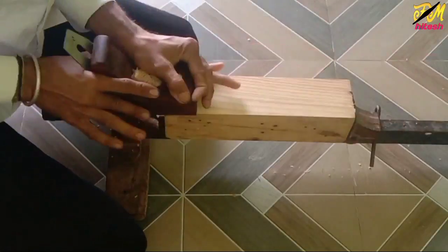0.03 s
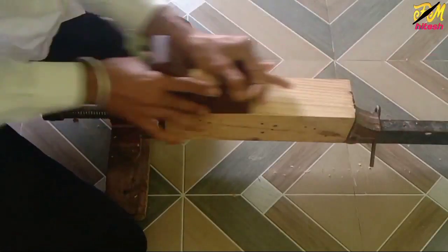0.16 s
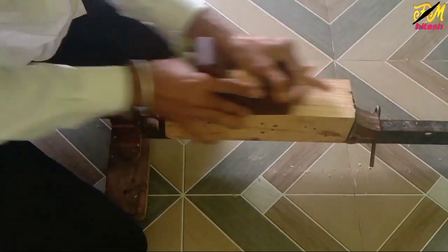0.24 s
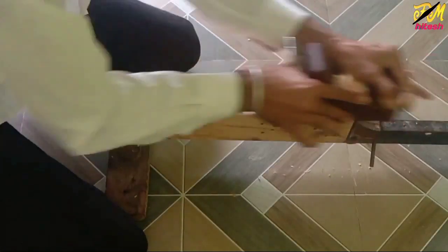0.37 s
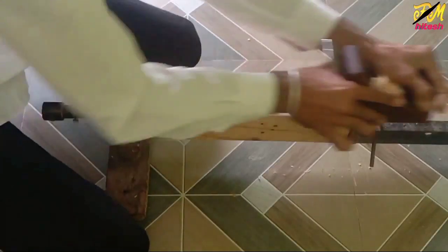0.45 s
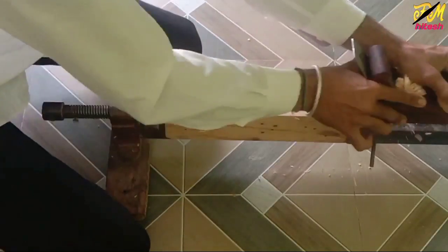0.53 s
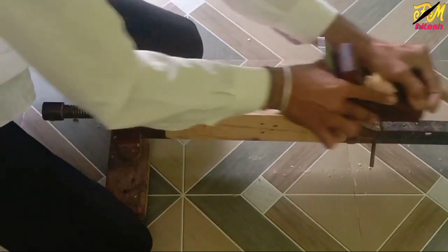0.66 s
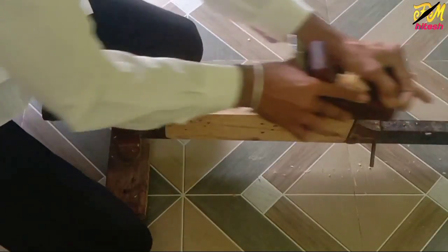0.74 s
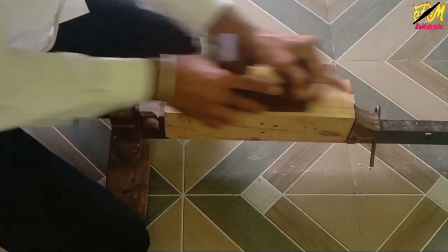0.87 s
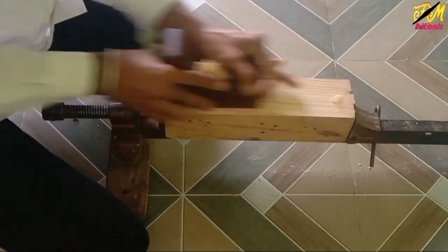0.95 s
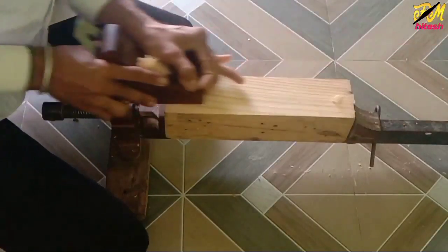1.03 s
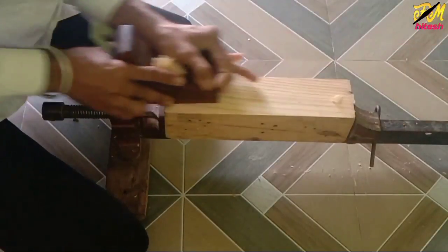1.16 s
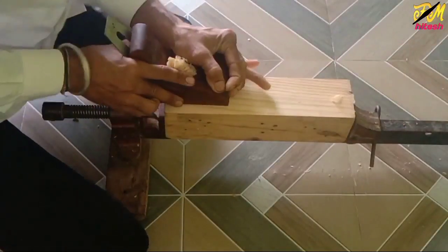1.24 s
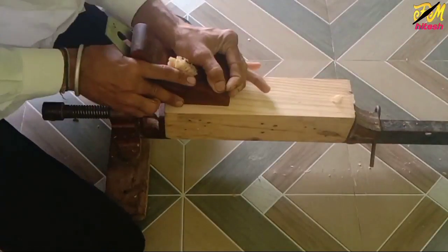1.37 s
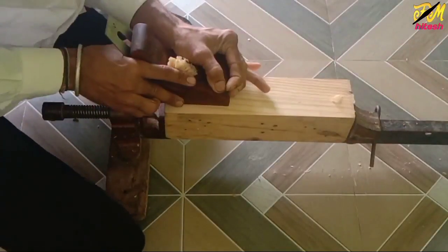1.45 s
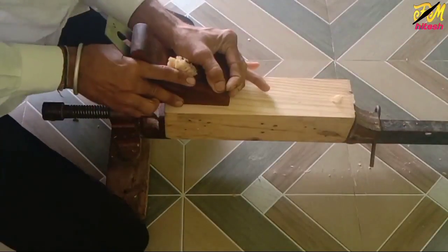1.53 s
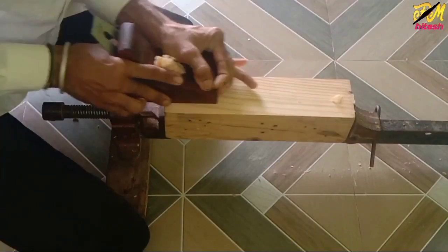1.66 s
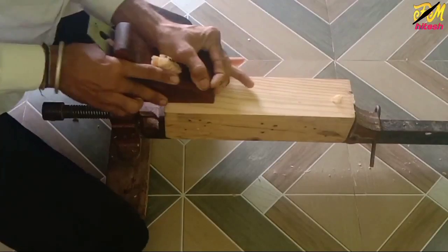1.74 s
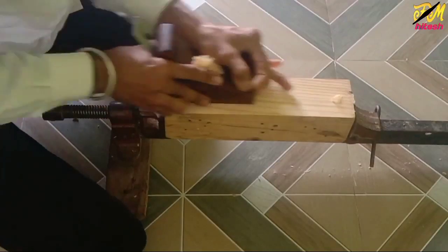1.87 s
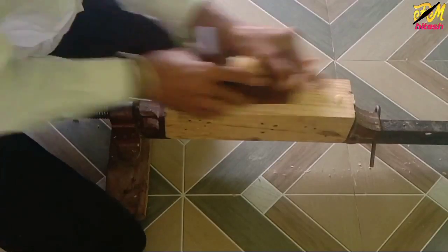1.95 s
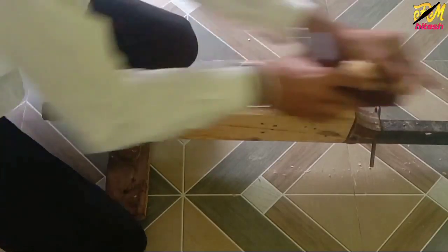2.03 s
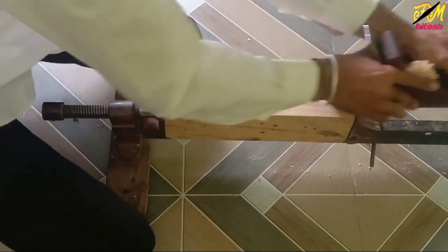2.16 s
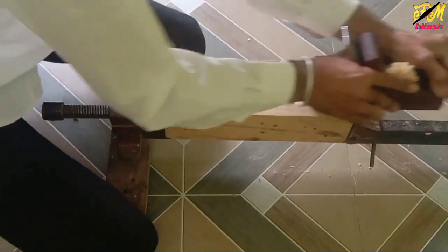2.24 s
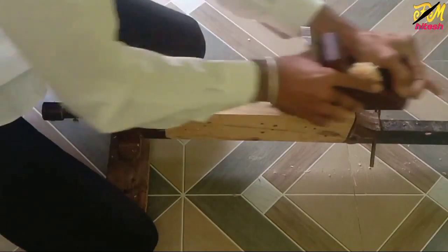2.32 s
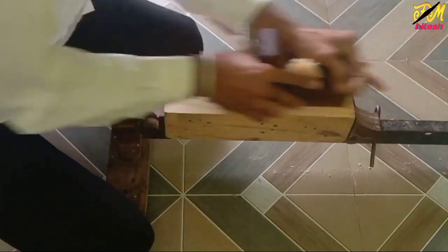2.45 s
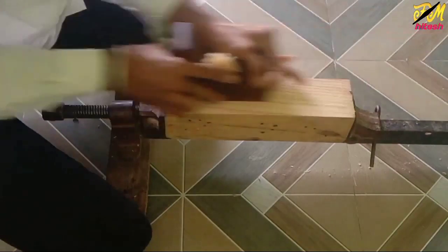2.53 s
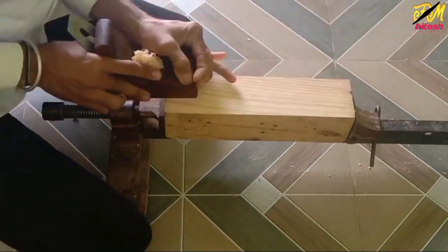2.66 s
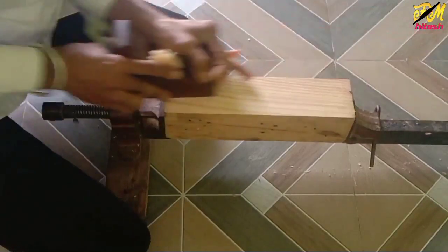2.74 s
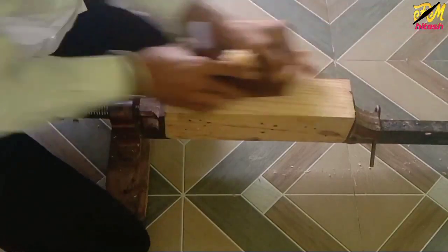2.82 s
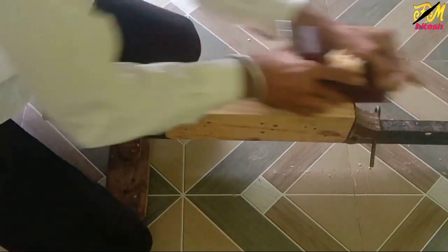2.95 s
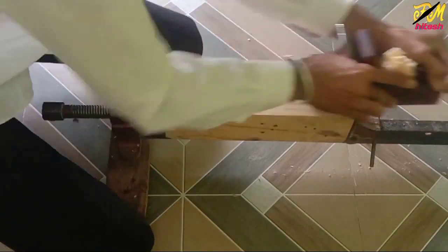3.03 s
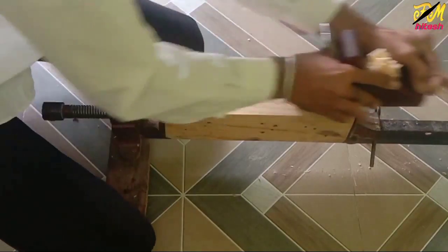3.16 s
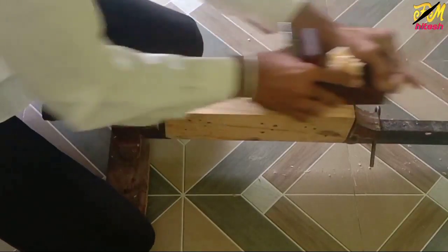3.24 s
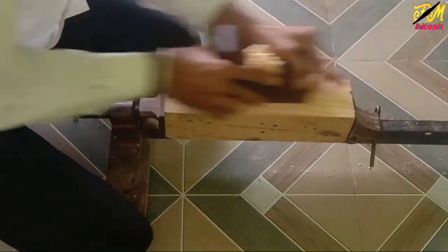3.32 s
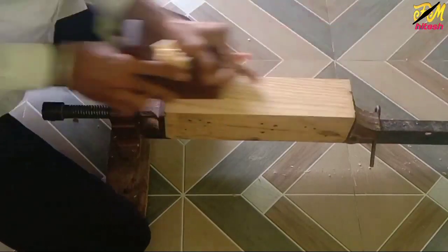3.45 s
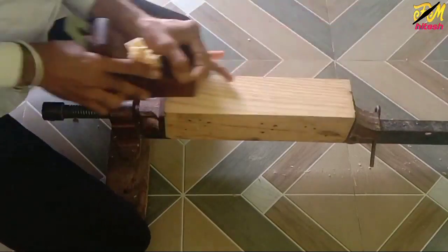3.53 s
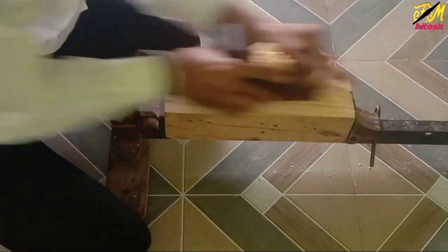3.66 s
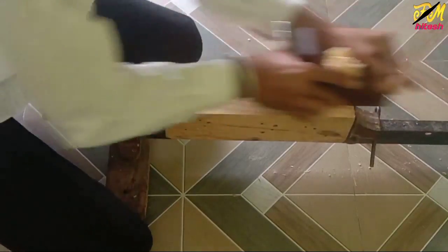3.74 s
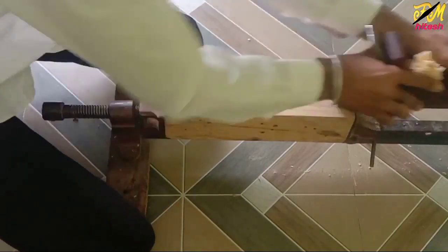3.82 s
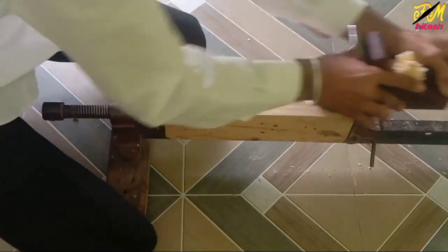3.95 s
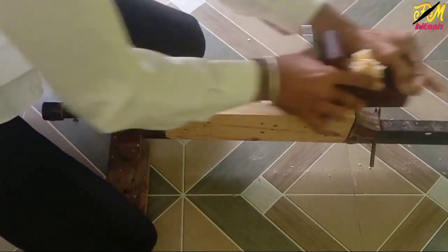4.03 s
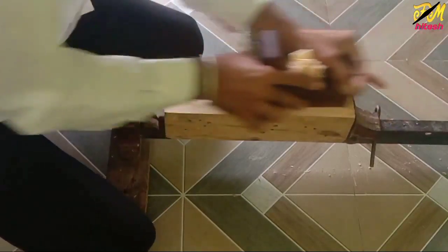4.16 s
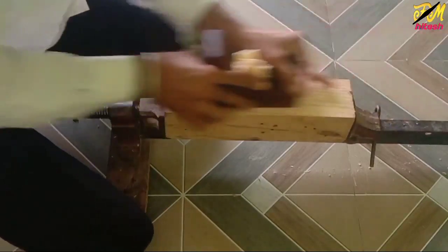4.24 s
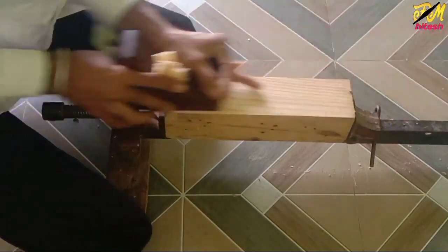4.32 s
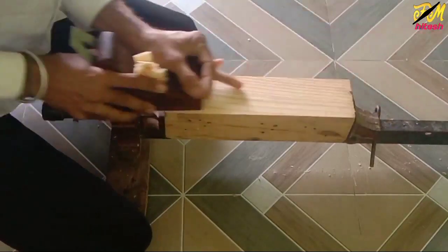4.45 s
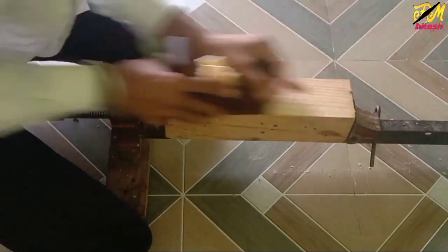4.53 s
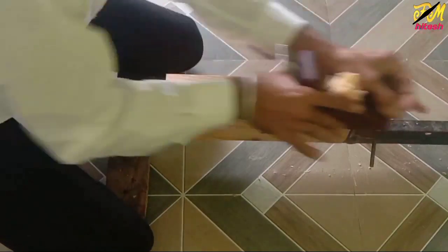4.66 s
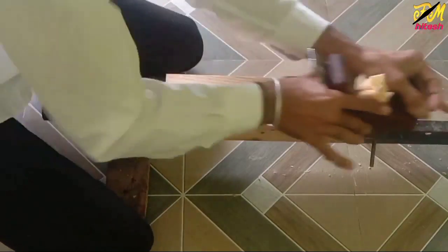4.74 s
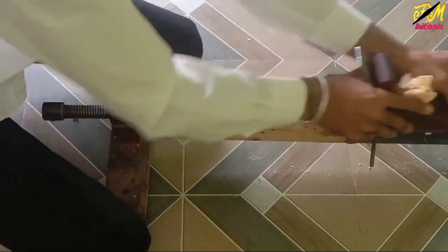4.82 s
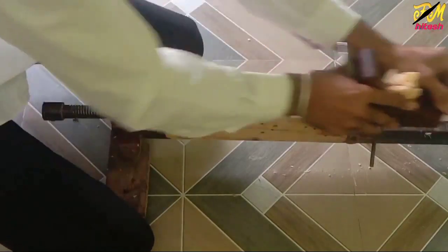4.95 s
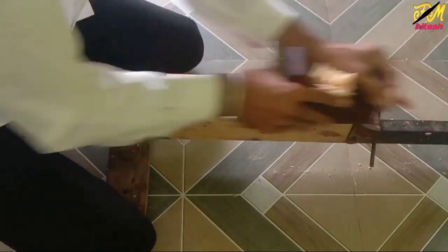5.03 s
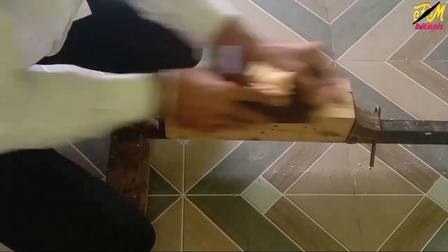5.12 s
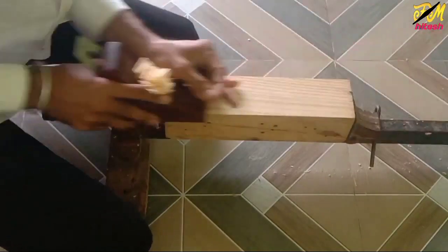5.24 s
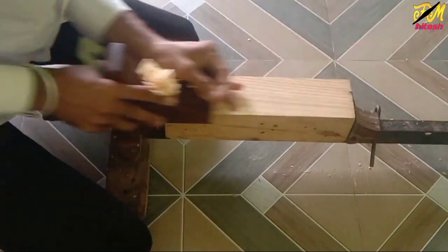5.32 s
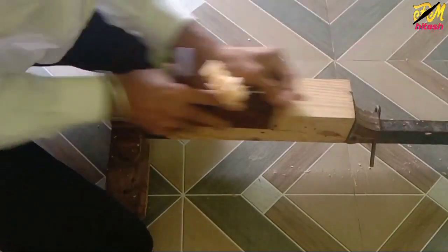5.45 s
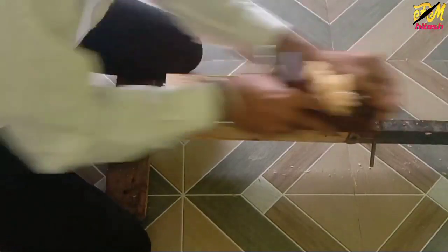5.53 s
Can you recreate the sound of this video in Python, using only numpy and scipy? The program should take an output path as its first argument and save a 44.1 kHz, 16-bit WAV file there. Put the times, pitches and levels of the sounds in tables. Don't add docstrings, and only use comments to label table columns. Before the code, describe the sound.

Close, mono phone pickup of planing wood. Each forward push starts with a small click, swells into a dry woody rasp with crackling hiss, and dies quickly into a short hard-room echo. Quieter, hollow drags and low knocks come between. After the first stroke the plane lands with a wooden clack and rests, then strokes continue to the end.

```python
import sys
import numpy as np
from scipy import signal
from scipy.fft import rfft, irfft
from scipy.io import wavfile
from scipy.ndimage import uniform_filter1d

SR = 44100
rng = np.random.default_rng(int(sys.argv[2]) if len(sys.argv) > 2 else 0)


def convert_level_to_amplitude(level_db):
    exponent = np.asarray(level_db, float) / 20
    return 10 ** exponent


def master(y):
    cut = np.clip(np.atleast_2d(y).T, -1, 1)
    pcm = np.round(cut * 32767)
    wavfile.write(sys.argv[1], SR, pcm.astype(np.int16))


N = 246246


def evened(x):
    return x / np.sqrt(np.mean(x ** 2) + 1e-20)


def read(points, hz):
    f, value = np.transpose(points)
    return np.interp(np.log(hz + 1), np.log(f + 1), value)


def add(mix, s, sound):
    part = mix[round(s * SR):][:len(sound)]
    part += sound[:len(part)]


def pole_radius(width_hz):
    return np.exp(-np.pi * 1.55 * width_hz / SR)


def resonate(x, hz, width):
    r = pole_radius(width)
    pole = r * np.exp(2j * np.pi * hz / SR)
    return 2 * signal.lfilter([(1 - r) ** 2], [1, -2 * pole, pole ** 2], x).real


def smooth(x, width):
    r = pole_radius(width)
    return signal.lfilter([(1 - r) ** 2], [1, -2 * r, r ** 2], x)


def ring(x, modes):
    click = np.eye(1, 6000)[0]
    shape = np.zeros(len(click))
    for k, (hz, width, db) in enumerate(modes):
        shape += (-1) ** k * convert_level_to_amplitude(db) * resonate(click, hz, width)
    return signal.oaconvolve(x, shape / np.linalg.norm(shape))[:len(x)]


def judder(span, depth_db):
    slow = uniform_filter1d(uniform_filter1d(rng.standard_normal(N), span), span)
    return convert_level_to_amplitude(depth_db * evened(slow))


def fibres(per_s, spread_db, rub):
    size = convert_level_to_amplitude(spread_db * np.minimum(rng.exponential(1, N), 4)) * rng.choice([-1., 1.], N)
    snaps = evened(size * (rng.random(N) < per_s / SR))
    return evened(snaps + rub * rng.standard_normal(N))


def swell(rise, top_db, below_db, bend, fade_db_s, touch=0.0014):
    t = np.arange(0, 1.1, .0004)
    to_go = np.clip(1 - t / rise, 0, 1) ** bend
    level_db = top_db - below_db * to_go - fade_db_s * np.maximum(t - rise, 0)
    gain = np.minimum(t / touch, 1) * convert_level_to_amplitude(level_db)
    return np.interp(np.arange(0, t[-1], 1 / SR), t, gain)


def motion(rows, feeds, bend, hurry=1, touch=0.0014):
    power = np.zeros((len(feeds), N))
    for start, rise, top_db, below_db, colour_db in rows:
        for part, (db, share, slow_db, fade) in zip(power, feeds):
            level_db = top_db + db + share * colour_db
            gain = swell(rise, level_db, below_db + slow_db, bend, fade * hurry, touch)
            add(part, start, gain ** 2)
    return power


# start_s, rise_s, top_db, start_below_top_db, weight_db
DRAGS = [(0.0, 0.0066, -33.5, -23.5, 14.5), (0.06, 0.012, -40, 10, 12.5), (0.78, .06, -55.5, 8, 15),
         (0.838, 0.024, -45.5, -3, -2), (0.89, .12, -36, 20, 5), (1.0, 0.11, -35.5, 6.5, 14),
         (1.725, 0.087, -57.5, 11, 5), (1.812, .02, -57.5, -4, 9), (1.873, 0.067, -31.5, 20.5, -11),
         (2.41, 0.11, -45, 9, 5), (2.455, 0.26, -35.5, 17, 1.5), (3.335, 0.15, -40, 0.5, 1),
         (3.44, 0.09, -41, 12, 1), (3.553, 0.022, -37.5, -9, 5.5), (4.178, .01, -45.5, -2, 7),
         (4.195, 0.031, -43, 7, 11.5), (4.24, 0.136, -42, 6.5, 7.5), (4.345, .11, -39.5, -0.5, 13.5),
         (5.07, 0.087, -40.5, 12.5, 4), (5.135, 0.056, -40.5, 5, 4), (5.225, 0.05, -33, 5.5, 9),
         (5.3, 0.024, -37.5, -12, 14.5)]
# start_s, rise_s, top_db, start_below_top_db, weight_db
PRESSES = [(0.228, 0.02, -24, 4.5, -13), (0.281, .16, -22.5, -3.5, 4.5), (0.52, 0.08, -36, 6, 8),
           (1.912, 0.063, -19, 3.5, -3.5), (2.857, 0.042, -28, -1.5, -3.5), (3.0, 0.056, -25.5, 20, -2),
           (3.703, 0.0031, -28.5, -16, 4), (3.78, 0.064, -26, 28, -2), (4.576, 0.036, -22.5, -2, -0.5),
           (4.65, 0.046, -21, 28, 4.5), (4.8, 0.062, -32.5, -9, 10), (5.464, .03, -22.5, -5, -1.5),
           (5.51, 0.039, -39, -7, 30.5)]
# start_s, rise_s, top_db, start_below_top_db, thickness_db
CUTS = [(0.228, 0.019, -25, 2, 0.5), (0.281, 0.14, -25, 6.5, -8), (1.912, 0.13, -17, 20, 2.5),
        (2.857, 0.1, -16, 10.5, -8.5), (3.03, 0.032, -26.5, -7.5, 3.5), (3.703, 0.0057, -26.5, -4, -18),
        (3.788, 0.032, -19.5, -1, -4.5), (4.576, 0.023, -24, 10, 10), (4.66, 0.069, -21.5, 0.5, 8),
        (5.464, 0.1, -23.5, 3, 10)]
# start_s, rise_s, top_db, start_below_top_db, weight_db
SKID = [(1.294, 0.021, -31.5, 10, 15.7)]
# level_db, share_of_weight_or_thickness, extra_start_below_db, fade_db_s
DRAG_FEEDS = [
    (-4, 0.38, .1, 94),
    (-3.5, 0.67, 2, 236),
    (2, .01, 2, 200),
    (-11, .01, 0.8, 270),
    (1, 0.73, -4, 190),
    (1.5, 0.19, 4, 810),
    (-14.5, 0.17, -6, 47),
]
PRESS_FEEDS = [
    (0.5, .01, 3.5, 86),
    (-2, .01, 4.5, 97),
    (-10, 0.58, 5.2, 99),
    (-29.5, .01, -6.5, 95),
    (-0.5, 0.71, 3.5, 79),
    (-16, .01, -8, 70),
    (-21, -0.8, -8, 44),
]
CUT_FEEDS = [
    (-24, .3, 11, 90),
    (-3, 0.6, .1, 113),
    (0., .01, 4, 111),
    (-12, .01, 2, 154),
    (-22, 0.1, .1, 90),
    (-5, .01, 6, 165),
    (-73.5, 0.012, -11, 180),
]


def contact():
    back = motion(DRAGS, DRAG_FEEDS, bend=1.27, touch=0.0063)
    back += motion(SKID, DRAG_FEEDS, bend=1.27, hurry=1.7)
    push = motion(PRESSES, PRESS_FEEDS, bend=1.67) + motion(CUTS, CUT_FEEDS, bend=0.49)
    return np.sqrt(push + back)


# factor_on_pitch, width_hz, level_db
BLOCK = [(.9, 120, -12), (1.001, 55, 2.5), (1.05, 65, -1)]
# time_s, pitch_hz
BLOCK_PITCH = [(0.0, 1213), (0.73, 1273), (0.92, 1146), (1.121, 1255), (1.66, 1200), (1.76, 1050),
               (1.86, 1155), (2.11, 1234), (2.55, 1236), (2.71, 1147), (2.84, 1250), (3.06, 1283),
               (3.88, 1235), (4.12, 1222), (4.82, 1262), (5.221, 1217), (5.58, 1275)]


def block_ring(x):
    s, hz = np.transpose(BLOCK_PITCH)
    turns = np.cumsum(np.interp(np.arange(N) / SR, s, hz)) / SR
    out = np.zeros(N)
    for k, (factor, width, db) in enumerate(BLOCK):
        turn = np.exp(2j * np.pi * factor * turns)
        out += (-1) ** k * convert_level_to_amplitude(db) * 2 * (turn * smooth(x / turn, width)).real
    return convert_level_to_amplitude(20.0) * out


def patchy(x, depth_db):
    z = signal.stft(x, SR, nperseg=256, noverlap=192)[2]
    patches = uniform_filter1d(rng.standard_normal(z.shape[::-1]).T, size=3, axis=0)
    patches = evened(uniform_filter1d(uniform_filter1d(patches, size=18, axis=1), size=12, axis=1))
    z *= convert_level_to_amplitude(depth_db * patches - depth_db ** 2 / 3.35)
    return signal.istft(z, SR, nperseg=256, noverlap=192)[1][:N]


# pitch_hz, width_hz, level_db
WOOD = [(1056, 135, -1), (1560, 215, 3), (1900, 212, -2.5), (2064, 237, 0.5)]
BODY = [(2625, 1000, -6.5), (2880, 263, 3.5), (3250, 257, 3), (3520, 850, -5.5)]
SHAVING = [(4950, 870, 0), (5890, 690, -0.5), (6560, 400, 2), (7480, 900, -9)]
EDGE = [(9300, 1400, -3.5), (10630, 1270, -4.5), (12100, 730, -8.5), (15170, 970, 0.5)]
IRON = [(3900, 170, 6), (4203, 400, -10)]


def planing(wood, body, hiss, fizz, block, iron):
    grip = judder(span=1500, depth_db=1.81)
    tear = evened(grip * fibres(per_s=2500., spread_db=3.0, rub=0.94))
    curl = evened(grip * fibres(per_s=3800.0, spread_db=3.0, rub=1.5))
    rings = block_ring(block * tear * judder(span=220, depth_db=0.5))
    rings += ring(iron * tear * judder(span=540, depth_db=4.0), IRON)
    cutting = ring(wood * tear, WOOD)
    cutting += ring(body * tear * judder(span=230, depth_db=-0.5), BODY)
    cutting += ring(hiss * curl, SHAVING) + ring(fizz * curl, EDGE)
    return convert_level_to_amplitude(-2.5) * (rings + patchy(cutting, depth_db=2.5))


# start_s, level_db, pitch_hz, stand_shake_db
BUMPS = [(0.066, -26.5, 620, -37.5), (0.259, -24, 182, -71), (0.87, -42, 300, -63),
         (1.139, -29.5, 188, -48), (1.3, -32, 170, -32), (1.875, -47, 298, -49), (1.938, -20.5, 553, -42.5),
         (2.501, -48, 418, -59), (2.725, -33.5, 206, -50), (2.873, -25.5, 177, -33.5),
         (3.099, -38, 180, -48.5), (3.567, -35, 196, -46), (3.704, -25, 526, -38.5),
         (4.199, -44, 190, -57.5), (4.449, -25.5, 340, -57), (4.584, -17.5, 183, -38.5),
         (5.333, -28, 430, -42)]


def shake():
    out = np.zeros(N)
    for s, _, _, db in BUMPS:
        add(out, s, swell(0.0083, db, 12, bend=0.88, fade_db_s=99.5))
    return out


# pitch_hz, width_hz, level_db
STAND = [(86.4, 39, -15.5), (130, 64, -15), (177, 16.6, 1.5), (233, 36, -10.5)]
CLAMP = [(390, 93, -6.5), (412, 62, -3), (660, 360, -6.5), (752, 69, -1), (891, 111, -1.5)]
FLOOR = [(62, 56, -0.5), (105, 34, 3.5)]


def stand(clamp):
    load = judder(span=600, depth_db=2.5) * rng.standard_normal(N)
    shaking = shake()
    low = shaking + convert_level_to_amplitude(-26) * clamp + convert_level_to_amplitude(-70.5)
    mid = convert_level_to_amplitude(-3.5) * shaking + clamp
    return ring(low * load, STAND) + ring(mid * load, CLAMP) + convert_level_to_amplitude(-71) * ring(load, FLOOR)


def bumps():
    out, t = np.zeros(N), np.arange(3000) / SR
    for s, db, hz, _ in BUMPS:
        push = rng.standard_normal(len(t)) * np.minimum(t / 0.004, 1) * np.exp(-t / 0.008)
        knock = resonate(push, hz, 94) + 0.065 * ring(push, CLAMP) + 0.022 * ring(push, STAND)
        add(out, s, convert_level_to_amplitude(db + 0.5) * knock / abs(knock).max())
    return out


def slips(rows, length_s):
    out, t = np.zeros(N), np.arange(2400) / SR
    for s, db, hz in rows:
        burst = rng.standard_normal(len(t)) * np.minimum(t / 0.0028, 1) * np.exp(-(t / length_s) ** 4)
        tone = resonate(burst, hz, 190) + .06 * ring(burst, BODY) + 0.03 * ring(burst, SHAVING)
        add(out, s, convert_level_to_amplitude(db) * tone / abs(tone).max())
    return out


# start_s, level_db, pitch_hz
LANDINGS = [(0.224, -23, 2860), (0.843, -49, 4930), (1.294, -18, 2920), (1.872, -35, 3870),
            (1.913, -17, 3040), (2.46, -34, 5600), (2.858, -25, 2520), (3.704, -16.5, 3200),
            (3.71, -14.5, 3200), (4.2, -26, 1240), (4.574, -25, 3000), (5.467, -31, 3250)]


def landings():
    return slips(LANDINGS, length_s=0.004)


# start_s, level_db, pitch_hz
CATCHES = [(0.283, -8.5, 2866), (0.391, -8, 3010), (.964, -25, 3800), (0.99, -21, 1190), (1.053, -18, 1200),
           (1.101, -19.5, 4000), (1.105, -30, 1236), (2.066, -9.5, 3270), (2.503, -34, 3900),
           (2.88, -9.5, 2870), (2.943, -11.5, 3760), (3.014, -7.5, 3890), (3.79, -9.5, 3030),
           (3.791, -7, 1910), (3.816, -13, 3170), (3.853, -13.5, 3250), (4.347, -25, 2770),
           (4.42, -45, 2800), (4.452, -19.5, 1330), (4.665, -9.5, 3160), (5.138, -28, 2890),
           (5.227, -22.5, 2880)]


def catches():
    return slips(CATCHES, length_s=0.011)


# start_s, level_db
SET_DOWN = [
    (1.303, -9.5),
    (1.316, -0.5),
]
# pitch_hz, level_db, t60_s
KNOCK = [(166, -36, 0.36), (332, -41, .35), (429, -37, 0.5), (745, -29, 0.41), (1200, -29, 0.47),
         (1240, -22, 0.21), (1405, -44, 0.33), (1690, -29, 0.35), (2030, -40, 0.45)]


def set_down():
    out, t = np.zeros(N), np.arange(SR // 2) / SR
    for s, blow_db in SET_DOWN:
        for hz, db, t60 in KNOCK:
            waver = evened(uniform_filter1d(uniform_filter1d(rng.standard_normal(len(t)), size=280), size=280))
            mode = convert_level_to_amplitude(db - 60 * t / t60) * np.sin(2 * np.pi * (hz * t + rng.random()))
            mode *= 1 + .6 * waver
            add(out, s, convert_level_to_amplitude(blow_db) * mode * np.minimum(t / 0.0026, 1))
    return out


# pitch_hz, t60_s
ROOM = [(150, 0.81), (500, 0.18), (1300, 0.57), (3000, 0.54), (6000, 0.54), (10000, 0.44), (15000, 0.3)]


def room(x):
    out, at = np.zeros(N), np.arange(260, SR - 20, 16)
    place = np.cumsum(np.full(N, 4.)) / SR
    for k in range(3):
        taps = np.zeros(SR)
        echo_at = None
        signs = rng.choice([-1., 1.], len(at))
        taps[at + rng.integers(0, 16, len(at))] = signs
        hz, t, z = signal.stft(taps, SR, nperseg=256)
        decay = convert_level_to_amplitude(-60 * t / read(ROOM, hz)[:, None])
        tail = signal.istft(z * decay, SR, nperseg=256)[1]
        share = np.sqrt(2 / 3) * np.cos(np.pi * (place + k / 3))
        out += signal.fftconvolve(share * x, tail / np.linalg.norm(tail))[:N]
    return out


def scene():
    *gains, clamp = contact()
    jolts = landings() + catches()
    near = planing(*gains) + jolts + bumps() + set_down() + stand(clamp)
    air = evened(signal.lfilter([1], [1, -.97], rng.standard_normal(N)))
    mono = near + convert_level_to_amplitude(-4) * room(near) + convert_level_to_amplitude(-69) * air
    return np.array([mono, mono])


def roll_off(x):
    return signal.sosfilt(signal.butter(12, 16500, fs=SR, output="sos"), x)


# pitch_hz, level_db
MIC = [(40, -16), (100, -11), (600, 0.5), (2500, 1.67), (4600, -1), (8000, 2.5), (13500, 2.5), (15500, 3.5)]
# pitch_hz, level_db per bin
GATE = [(100, -99.5), (1000, -68), (4000, -81), (10000, -99)]


def record(dry):
    hz = np.fft.rfftfreq(N, 1 / SR)
    limit = np.clip((15700 - hz) / 250, 0, 1) + 1e-4
    coloured = irfft(rfft(dry) * convert_level_to_amplitude(read(MIC, hz)) * limit, N)
    bin_hz, _, z = signal.stft(coloured, SR, nperseg=512, noverlap=384)
    power = uniform_filter1d(uniform_filter1d(abs(z) ** 2, size=9, axis=1), size=5, axis=2)
    over_db = 10 * np.log10(power + 1e-16) - read(GATE, bin_hz)[:, None]
    whole_db = 10 * np.log10(power.sum(axis=1, keepdims=True) + 1e-16) + 57
    shut_db = np.clip(1.5 * whole_db, -18, 0)
    z *= convert_level_to_amplitude(np.clip(0.67 * over_db, -25, 0) + shut_db)
    mix = signal.istft(z, SR, nperseg=512, noverlap=384)[1][:, :N]
    return roll_off(mix)


dry = scene()
out = record(dry)
master(out)
```